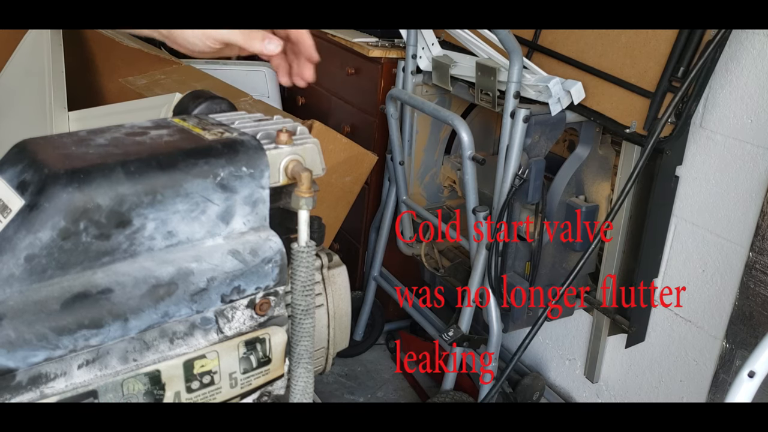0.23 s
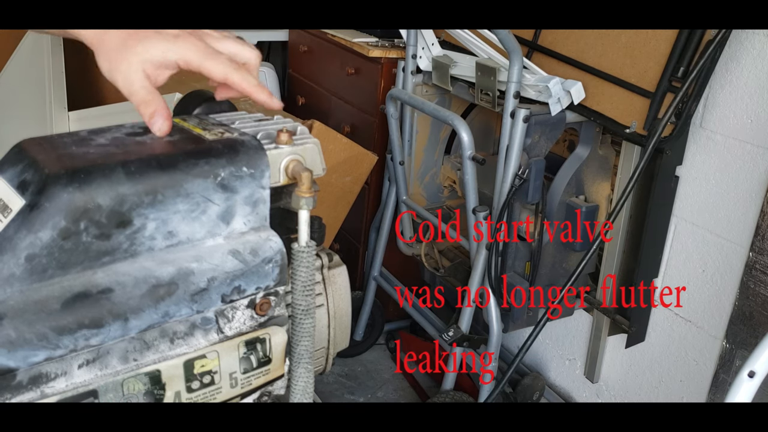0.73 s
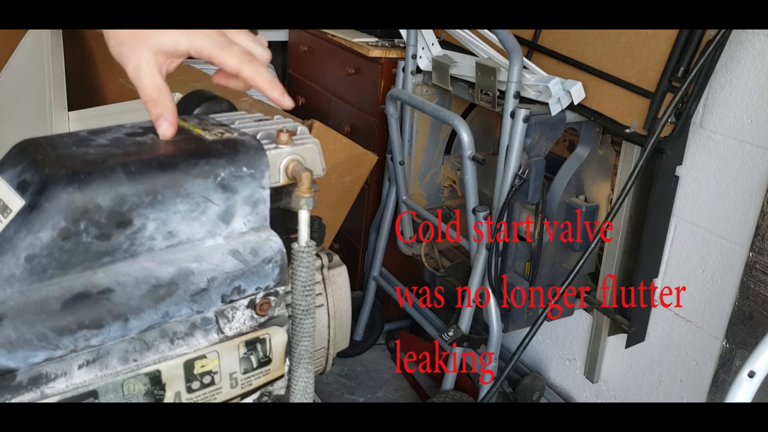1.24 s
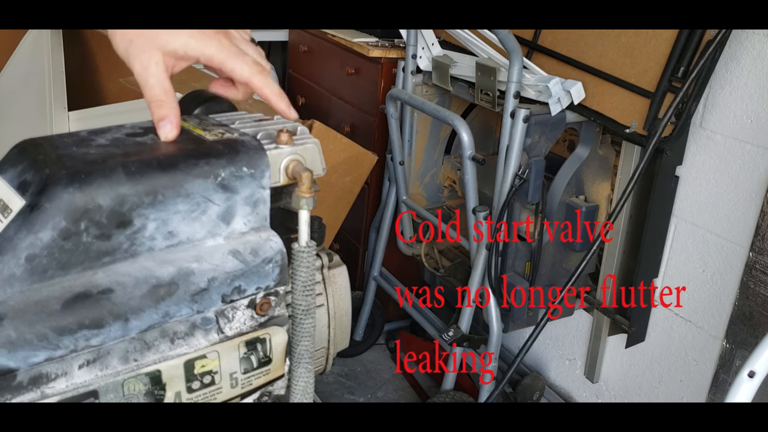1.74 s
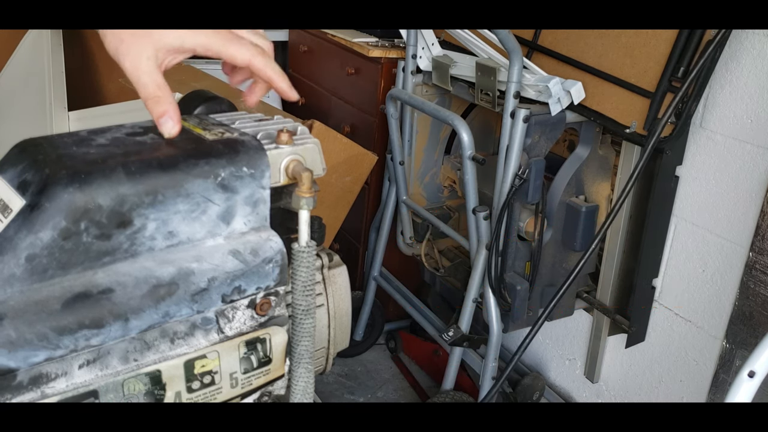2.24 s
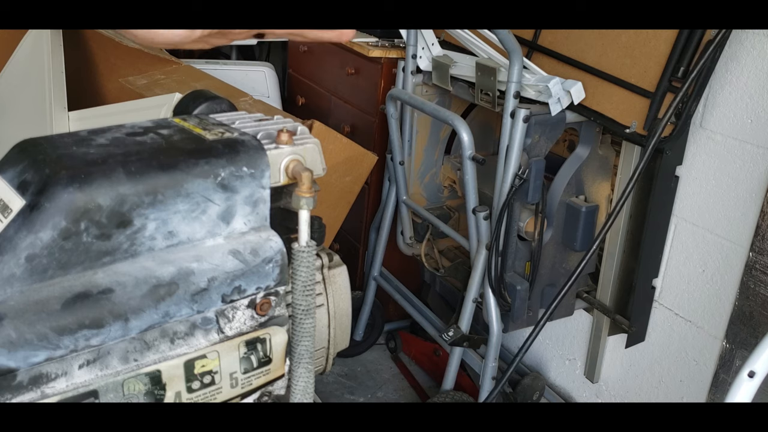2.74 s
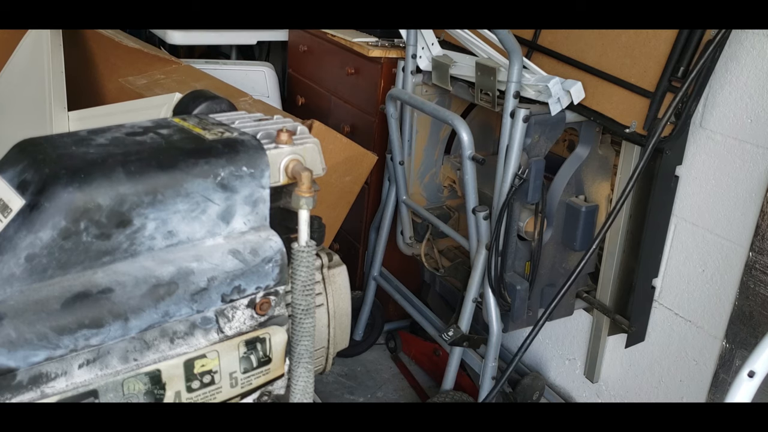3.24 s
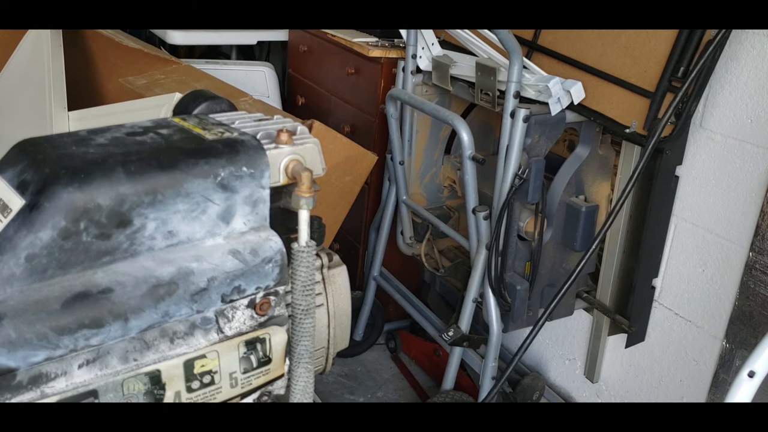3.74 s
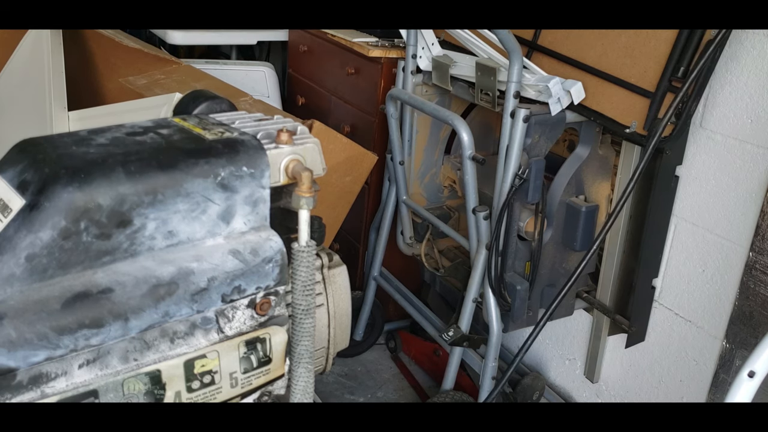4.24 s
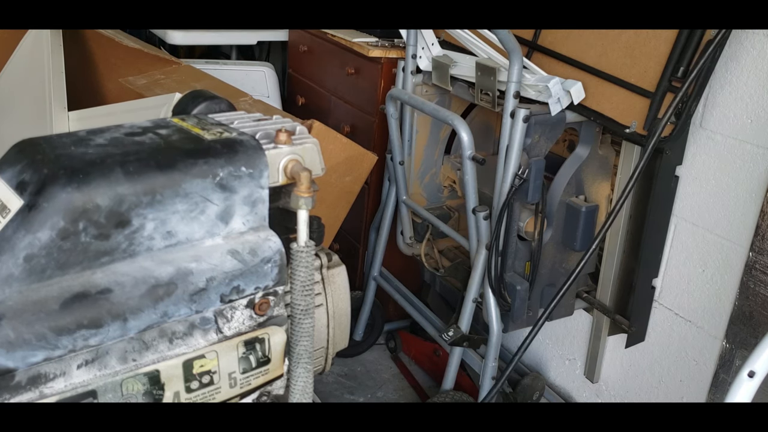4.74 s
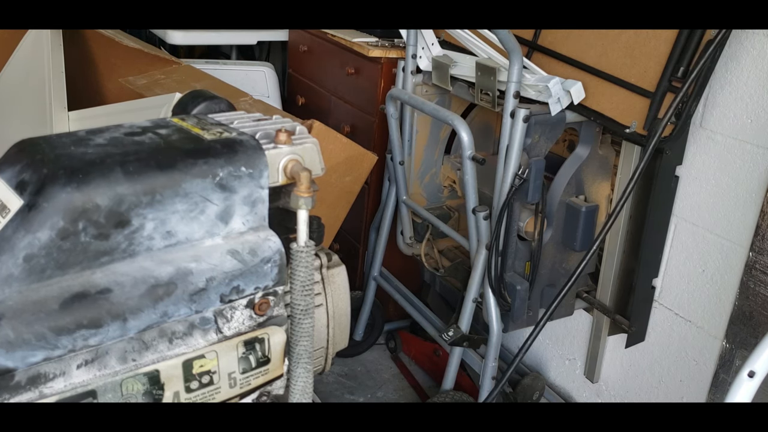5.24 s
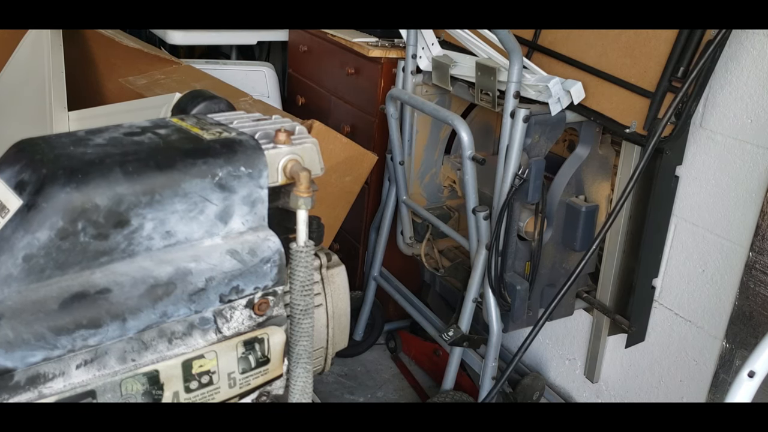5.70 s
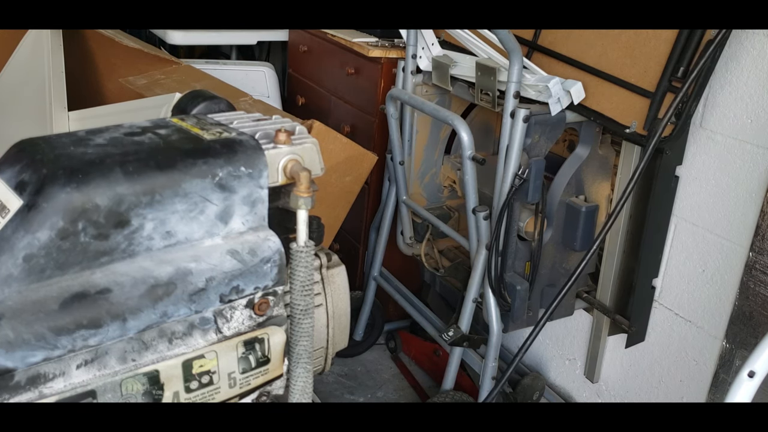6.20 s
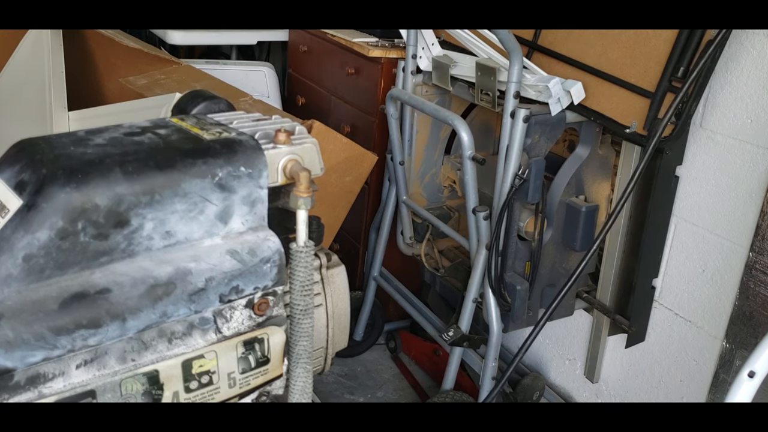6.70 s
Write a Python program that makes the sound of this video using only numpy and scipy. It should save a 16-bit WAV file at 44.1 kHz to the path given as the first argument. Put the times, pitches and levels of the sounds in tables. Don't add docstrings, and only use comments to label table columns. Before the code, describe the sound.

Close, unbroken buzzing chug of an air compressor, metallic rattle and thin high ringing on top, briefly spitting hisses as a finger touches a leak.

```python
import sys
import numpy as np
from scipy import signal
from scipy.fft import rfft, irfft, next_fast_len
from scipy.io import wavfile
from scipy.ndimage import uniform_filter1d, map_coordinates

SR = 44100
rng = np.random.default_rng(int(sys.argv[2]) if len(sys.argv) > 2 else 0)


def undo_db(level):
    steps = np.asarray(level, float) / 20
    return 10 ** steps


def transcribe(u):
    v = np.clip(np.atleast_2d(u).T, -1, 1)
    q = np.round(v * 32767).astype(np.int16)
    wavfile.write(sys.argv[1], SR, q)


N = 306936

# t/s, level/dB
LOUDNESS = [(0, -35), (.6, -35), (.85, -35.5), (.98, -35), (1.2, -37), (1.9, -37), (2.2, -38), (3.2, -37.5),
            (3.6, -36.5), (4.3, -36.5), (4.7, -35), (5.7, -35), (6.05, -35.5), (6.96, -35)]
# f/Hz, width/Hz, level/dB
HEAD_MODES = [(743, 110, 2.5), (976, 104, 1.5), (1920, 37, -7), (2667, 18, 6), (2848, 83, 3.5),
              (3683, 22, -1.5), (4050, 170, -9), (5700, 36, -1.5), (5820, 52, -17), (6145, 34, -2.5),
              (6880, 120, -8.5), (8730, 460, -1), (9835, 54, 5), (10800, 170, -8.5)]

TIME = np.arange(N) / SR
FILL = TIME / TIME[-1] - .5
SHADE_DB = np.interp(TIME, *np.transpose(LOUDNESS))
SHADE_DB = SHADE_DB - SHADE_DB.mean()
SHAFT_HZ, START_TURN = 57.37509, .0642
AHEAD_TURNS_PER_DB = .009
TURN = SHAFT_HZ * TIME + START_TURN - AHEAD_TURNS_PER_DB * (uniform_filter1d(SHADE_DB, SR // 2) - 1)


def unit(x):
    return x / np.sqrt(np.mean(x ** 2) + 1e-20)


def along(points, hz):
    f, v = np.transpose(points)
    return np.interp(np.log(hz + 1), np.log(f + 1), v)


def wobble(rate):
    grid = np.linspace(0, TIME[-1], int(8 * rate * TIME[-1]) + 2)
    knots = rng.standard_normal(int(N * rate / SR) + 4)
    return np.interp(TIME, grid, map_coordinates(knots, [grid * rate]))


def filtered(x, response):
    m = next_fast_len(N + SR // 2)
    return irfft(rfft(x, m) * response(np.fft.rfftfreq(m, 1 / SR)), m)[..., :N]


def modes(table, f):
    total = 0
    for k, (centre, width, db) in enumerate(table):
        damping = 1j * f * width
        total = total + (-1) ** k * undo_db(db) * damping / (centre * centre - f * f + damping)
    return total


def spread(pair, spectrum):
    # f/Hz, left-right likeness (-1 to 1)
    likeness = [(60, 0.81), (300, 0.84), (700, 0.57), (1400, -0.35), (3100, -0.013), (7000, -0.19),
                (15000, 0.36)]
    # f/Hz, left minus right level/dB
    balance = [(60, 13), (110, 2.5), (200, -3), (380, 6), (700, 5), (1290, 10.5), (2380, 2), (4400, 0.5),
               (8120, 3.5), (15000, -9.5)]

    def mid_side(hz):
        turn = np.arccos(np.clip(along(likeness, hz), -1, 1)) / 2
        return undo_db(along(spectrum, hz)) * [np.cos(turn), np.sin(turn)]

    mid, side = filtered(pair, mid_side)
    ports = np.array([mid + side, mid - side])
    return unit(filtered(ports, lambda hz: undo_db(along(balance, hz) * [[.5], [-.5]])))


def strikes(angle, every_second, jitter_s, scatter_db):
    skip_s = 1.35
    turn = np.arange(1, int(TURN[-1]) - 1)
    luck = rng.standard_normal((len(turn), 2))
    s = np.interp(turn + angle, TURN, TIME)
    s += jitter_s * luck[:, 0] + 3e-5 * wobble(1.55)[(s * SR).astype(int)]
    hit = (turn + (s < skip_s)) % 2 == 0 if every_second else turn > 0
    at = s[hit, None] * SR
    taps = np.floor(at) + np.arange(-7, 9)
    kernel = np.sinc(taps - at) * np.cos(np.pi * (taps - at) / 16) ** 2
    kernel = kernel * undo_db(scatter_db * luck[hit, 1:])
    return np.bincount(taps.astype(int).ravel(), kernel.ravel(), N + SR)[:N]


def swell(pulses, decay_s):
    t = np.arange(SR // 20) / SR
    return signal.fftconvolve(pulses, np.exp(-t / decay_s) * (1 - np.exp(-t / 0.00061)))[:N]


def hum():
    # half order, level/dB, rise/dB as the tank fills
    half_orders = [
        (9, -72, 0),
        (23, -63, 9),
    ]
    mains_hz, mains_db = 359.6, -67
    tones = 0
    for k, db, rise in half_orders:
        angle = np.pi * k * TURN + 0.2 * wobble(3.25)
        tones = tones + undo_db(db + rise * FILL + SHADE_DB) * np.cos(angle)
    winding = undo_db(mains_db) * np.cos(2 * np.pi * mains_hz * TIME)
    return np.sqrt(2) * undo_db(wobble(2.07) + SHADE_DB) * (tones + winding)


def touch(s, length, db, sag_db):
    edge_s, entry_s, exit_s, exit_db = 0.0084, .03, 0.03, 2
    since, left = TIME - s, s + length - TIME
    gate = np.clip(np.minimum(since, left) / edge_s, 0, 1)
    flares = np.exp(-(since / entry_s) ** 2) + undo_db(exit_db) * np.exp(-((left - exit_s) / exit_s) ** 2)
    return undo_db(db) * gate * np.maximum(undo_db(-sag_db), flares)


def fingertip():
    # t/s, length/s, level/dB, sag/dB
    touches = [
        (.985, .18, -51, 10),
        (1.365, .03, -64, 3),
        (1.615, .155, -49.5, 4),
        (1.848, 0.138, -48.5, 2.7),
        (2.06, .16, -50, 2.9),
    ]
    # f/Hz, level/dB
    jet_colour = [(5000, -33), (8500, -8), (10500, -2), (13000, -3), (16000, -1.5)]
    # t/s, peak level/dB
    gusts = [
        (1.0, -56),
        (1.64, -52.5),
        (1.96, -51),
        (2.18, -51),
    ]
    spit = undo_db(1.2 * wobble(300) + 1.3 * wobble(60))
    jet = spread(spit * rng.standard_normal((2, N)), jet_colour)
    hiss = undo_db(13.5) * sum(touch(*row) for row in touches) * jet
    push = 0
    for s, db in gusts:
        since = TIME - s
        push = push + undo_db(db) * np.exp(-(since / .022) ** 2) * np.cos(2 * np.pi * 42 * since)
    return hiss + push * undo_db([[0], [-16]])


def air():
    # f/Hz, level/dB
    air_colour = [(25, -22), (45, -6), (80, -7), (250, -3.5), (520, 3), (800, -8.5), (1550, -8), (2300, -1),
                  (3000, -1.5), (5000, 0), (7000, 2), (9300, -11), (13000, -6), (15700, -5.5)]
    intake = swell(strikes(.0, False, 4e-4, 3.8), 0.0008)
    discharge = swell(strikes(0.82, True, 0.00027, 3.1), 0.0023)
    stroke = 1 + .5 * intake + 0.62 * discharge
    rush = filtered(rng.standard_normal((2, N)), lambda f: 1 + 0.37 * np.abs(modes(HEAD_MODES, f)))
    low = filtered(rush, lambda f: f < 1200)
    high = filtered(rush, lambda f: f >= 1200)
    return spread(low + high * unit(stroke * undo_db(0.61 * wobble(12))), air_colour)


def rattle():
    # f/Hz, level/dB
    rattle_colour = [(400, -45), (650, 3), (800, -17.5), (1000, -4), (1300, -4.5), (2200, -6), (2800, -7.5),
                     (4500, -3), (7000, -3), (8500, -12.5), (12000, -6), (16000, -11)]
    line_hz, line_rise_db = 760, 7
    t, out = np.arange(SR // 5) / SR, np.zeros((2, N))
    light = filtered(strikes(.02, False, 4e-6, 1), lambda f: f > 2090)
    every_turn = filtered(.5 * strikes(.86, False, 0, 0), lambda f: f < 2090)
    reed = strikes(.86, True, 3e-6, .6) - every_turn
    decay = undo_db(-60 * t / 0.32) + 2.15 * undo_db(-60 * t / 0.014)
    for blows in (light, reed):
        drift = 0.92 * wobble(0.418)
        for share in (np.cos(drift), np.sin(drift)):
            answer = rng.standard_normal((2, len(t))) * decay
            out += share * signal.fftconvolve(blows[None], answer, axes=1)[:, :N]
    out += (undo_db(line_rise_db * FILL + SHADE_DB) - 1) * filtered(out, lambda f: f < line_hz)
    resonant = filtered(out, lambda f: 1 + 4.2 * np.abs(modes(HEAD_MODES, f)))
    return spread(resonant, rattle_colour)


def steel():
    # f/Hz, width/Hz, level/dB
    steel_modes = [(13790, 110, -12), (14190, 200, -10), (14430, 60, -6), (14575, 60, -7)]
    turns, snaps = strikes(0.88, False, 5e-6, 1.5), strikes(1.0, True, 4e-6, 1.6)
    kick = 0.56 + swell(turns + 0.36 * snaps, 0.0017)
    shared, own = rng.standard_normal((2, N))
    noise = np.array([shared, 0.59 * np.roll(shared, shift=2) + 0.45 * own])
    drive = noise * [kick, .5 + 0.18 * kick] + 12 * (snaps - 0.49 * turns) * [[1], [.6]]
    ring = unit(filtered(drive, lambda f: modes(steel_modes, f)))
    whistle = np.cos(2 * np.pi * 14429 * TIME + 0.8 * wobble(20) + [[0], [1.5]])
    return unit(ring + undo_db(-3) * (.6 + .5 * kick) * whistle) * undo_db([[1], [-1]])


def valve():
    # f/Hz, level/dB
    snap_colour = [(1500, -52), (4000, -22), (8000, 7), (11000, 26), (13500, -11.5), (16000, -28)]
    t = np.arange(SR // 200) / SR
    rebound = undo_db(-9) * strikes(1.12, True, 1e-4, 3)
    grain = rng.standard_normal(len(t)) * np.exp(-t / .00025)
    snap = signal.fftconvolve(strikes(.86, True, 2e-5, 0.69) + rebound, grain)[:N]
    ports = np.array([snap, np.roll(snap, shift=-1)])
    return unit(filtered(ports, lambda hz: undo_db(along(snap_colour, hz))))


def pump():
    # left level/dB, right level/dB, rise/dB as the tank fills
    pulse = [(-56.5, -54.5, 0), (-51.5, -54, 0), (-51, -54.5, -2.5), (-44, -44.5, 1.5), (-57, -53.5, -3),
             (-45.5, -48, 0), (-54.5, -54, 4.5), (-37.5, -37.5, -1), (-47, -46, -1.5), (-50.5, -62.5, 7.5),
             (-50, -66.5, 6), (-51, -55, -1.5), (-60, -53, -3.5), (-51.5, -53, -3.5), (-54.5, -56.5, 4.5),
             (-53.5, -62.5, -1.5), (-57.5, -54, 2), (-67, -61, 0)]
    # f/Hz, left level/dB
    overtones = [(1090, -68.5), (1150, -75.5), (1220, -60), (1400, -67.5), (1600, -68.5), (1720, -62),
                 (1950, -56), (2070, -66)]
    delivery_side = [5, 10, 13, 16, 18]
    far_side_db, drift_db = -5, -5.5
    order = np.arange(1, 37)
    upper_db = along(overtones, SHAFT_HZ * order[18:])
    upper = np.c_[upper_db, upper_db + far_side_db, drift_db * rng.standard_normal(18)]
    left_db, right_db, rise_db = np.r_[pulse, upper].T

    log_gain = np.log(undo_db(np.r_[-70, left_db, -75 * np.ones(28)]))
    cepstrum = irfft(log_gain)
    cepstrum[1:64] *= 2
    cepstrum[65:] = 0
    echoes = rng.standard_normal((len(order), 2)) * np.clip(0.184 * (order[:, None] - 17), 0, 2)
    phase = rfft(cepstrum).imag[1:len(order) + 1] + echoes[:, 0]
    phase += .5 + .06 * order ** 2 - 2 * np.pi * .085 * order
    phase += np.pi * np.isin(order, delivery_side)
    lead = 0.047 * order + 0.2 * echoes[:, 1] * (order > 18)

    out = np.zeros((2, N))
    for k, left, right, rise, start, ahead in zip(order, left_db, right_db, rise_db, phase, lead):
        loose = 0.027 * k
        angle = 2 * np.pi * k * TURN + start + loose * (wobble(3.02) + .5 * wobble(24))
        size = np.sqrt(2) * undo_db(rise * FILL + (0.17 + 1.4 * loose) * wobble(6.4))
        out += size * undo_db([[left], [right]]) * np.cos(angle + [[ahead / 2], [-ahead / 2]])
    return out * undo_db(SHADE_DB)


def scene():
    head_db = -44.5 + 0.8 * SHADE_DB + 0.8 * FILL
    ring_db = -44 + 0.67 * SHADE_DB + 1.5 * FILL
    head = undo_db(3.5) * rattle() + undo_db(5.0) * air() + undo_db(-7.5) * valve()
    return hum() + fingertip() + undo_db(head_db) * head + undo_db(ring_db) * steel() + pump()


def top_cut(x):
    return signal.sosfilt(signal.butter(12, 17040, fs=SR, output="sos"), x)


def record(dry):
    top_hz = 15760
    mix = filtered(dry, lambda hz: hz < top_hz)
    return top_cut(mix)


dry = scene()
out = record(dry)
transcribe(out)
```